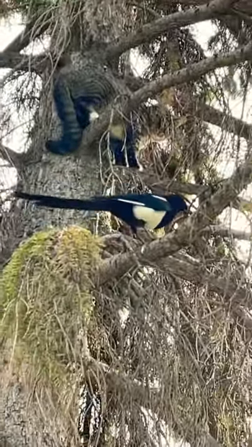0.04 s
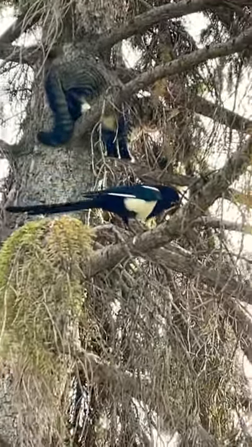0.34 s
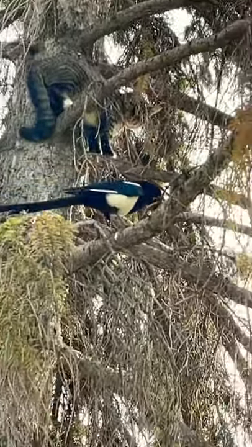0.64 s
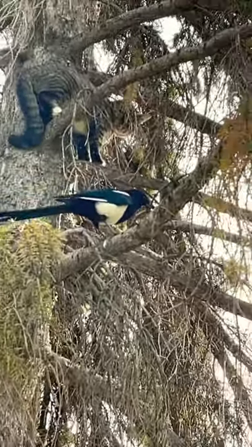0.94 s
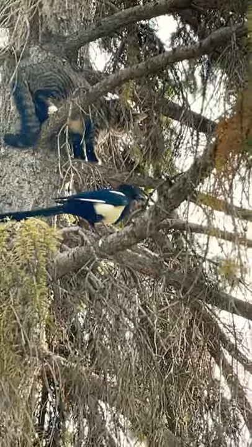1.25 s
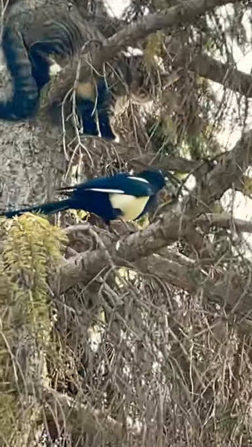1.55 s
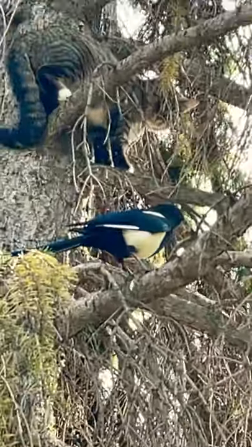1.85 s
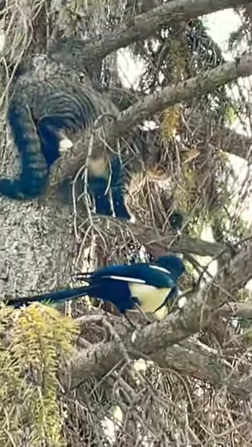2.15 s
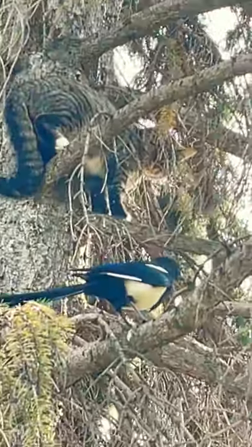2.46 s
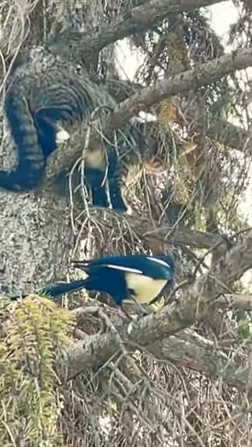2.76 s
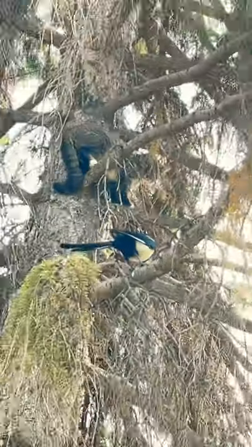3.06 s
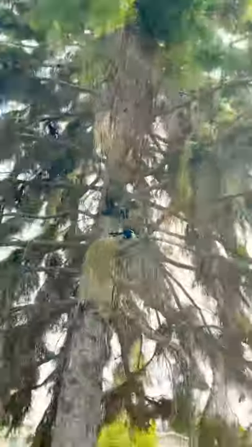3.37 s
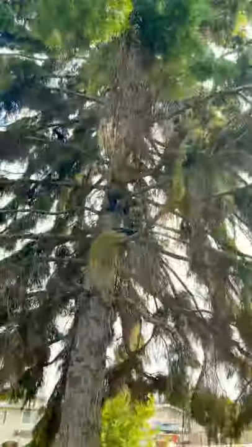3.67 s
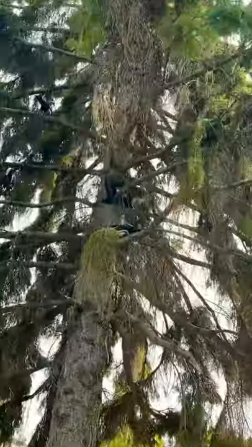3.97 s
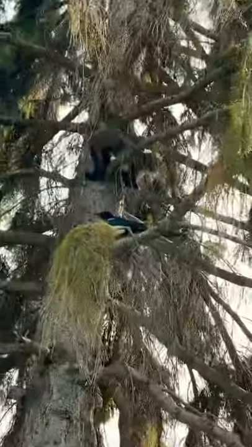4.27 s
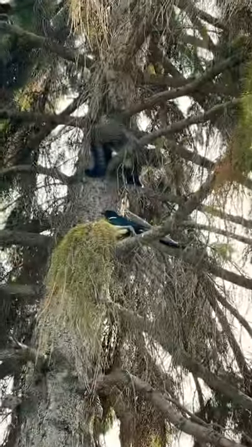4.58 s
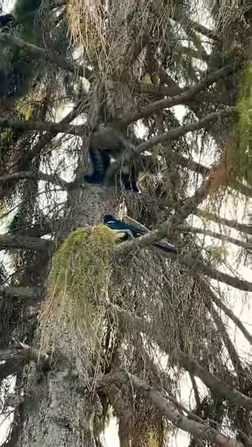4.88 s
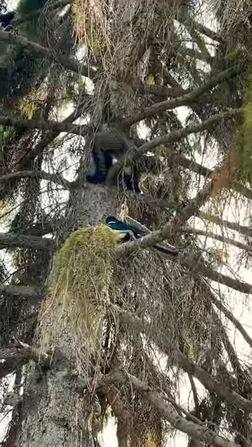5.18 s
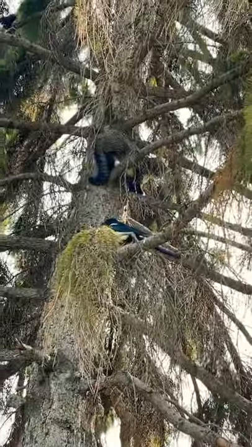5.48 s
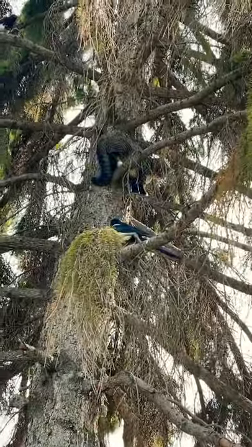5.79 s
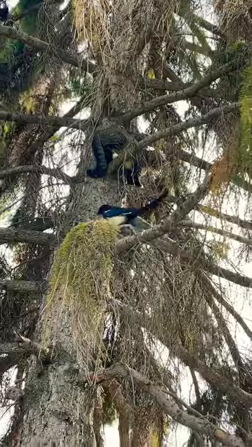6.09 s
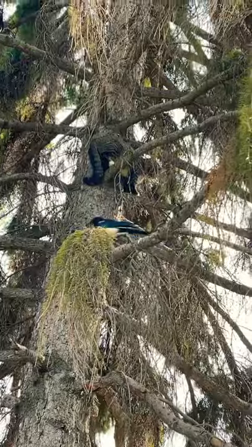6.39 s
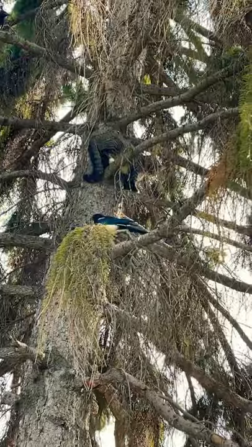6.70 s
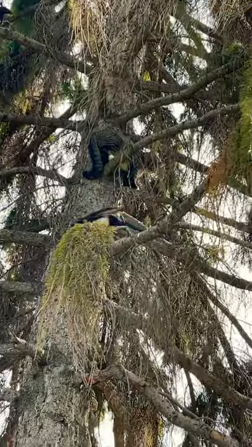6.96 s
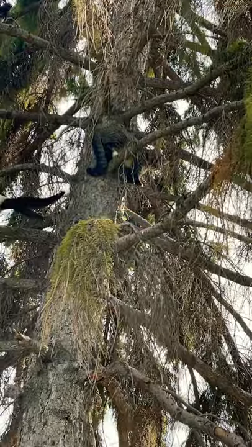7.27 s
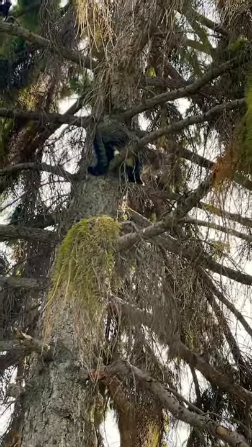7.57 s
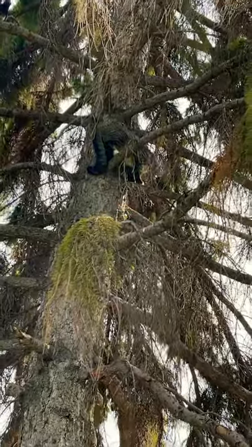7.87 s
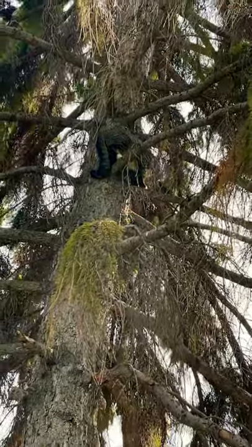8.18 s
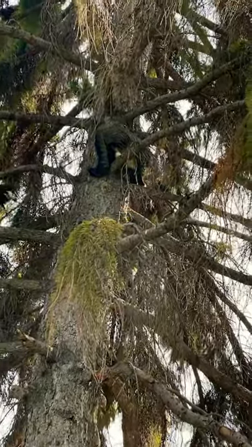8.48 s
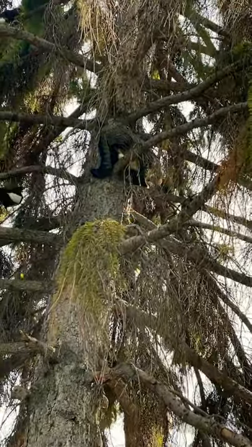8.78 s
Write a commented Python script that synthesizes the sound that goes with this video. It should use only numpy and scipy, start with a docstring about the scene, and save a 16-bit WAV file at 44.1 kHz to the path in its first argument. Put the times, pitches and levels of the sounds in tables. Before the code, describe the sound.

Harsh, rattling magpie calls come in three quick bursts outdoors, each note rising and leaving a slight echo. Low mutters fill the pauses, and soft rising squeals lead into the last burst. The microphone picks up dull handling bumps, thickest at the start, and an uneven wind rumble. Far behind are traffic, lightly hissing leaves and a few faint, very high whistles from a small bird.

```python
"""A magpie scolds a cat in a spruce: bursts of harsh notes, each a rising, rattling rasp that
brightens as the beak opens. Its voice box buzzes, and its throat and beak shape the buzz.
Trunk and branches scatter the calls and the garden answers. Handling and puffs of air bump the
microphone, over distant traffic, hissing leaves, a hoarse far tone and a small bird's thin whistles."""
import sys
import numpy as np
from scipy import signal
from scipy.fft import rfft, irfft, next_fast_len
from scipy.io import wavfile
from scipy.ndimage import uniform_filter1d, map_coordinates

SR = 44100
rng = np.random.default_rng(int(sys.argv[2]) if len(sys.argv) > 2 else 0)


def int16_out(signal):
    """Quantize to a 16-bit WAV file."""
    q = np.round(np.clip(np.atleast_2d(signal).T, -1, 1) * 32767)
    wavfile.write(sys.argv[1], SR, q.astype(np.int16))


N = 398663

# how loud the distant wash sounds; it steps up near 2.2 s as the microphone adjusts:
# t/s, relative level/dB
WASH_LOUDNESS = [(0.0, -60.5), (0.78, -53.5), (1.58, -58.5), (2.21, -55), (2.36, -51), (4.25, -50),
                 (4.43, -51), (5.61, -51), (6.19, -49.5), (7.9, -50.5), (9.04, -58)]


def amp(db):
    """Turn decibels into a gain."""
    return 10 ** (np.asarray(db) / 20)


def unit(x):
    """Scale x to an average (rms) level of 1."""
    return x / np.sqrt(np.mean(x ** 2) + 1e-20)


def steadied(x, window_s):
    """Even out slow changes in the level of x."""
    return x / np.sqrt(np.abs(uniform_filter1d(x ** 2, int(window_s * SR))) + 1e-12)


def along(points, hz):
    """Join (f/Hz, value) points on a log frequency axis."""
    f, values = np.transpose(points)
    return np.interp(np.log(hz + 1), np.log(f + 1), values)


def over_time(points):
    """Join (t/s, value) points across the whole scene."""
    return np.interp(np.arange(N) / SR, *np.transpose(points))


def wobble(rate, size):
    """A smooth curve through `rate` random values a second."""
    return map_coordinates(rng.standard_normal(int(size * rate / SR) + 4), [np.arange(size) * rate / SR])


def filtered(x, response):
    """Scale each frequency in x by response(hz)."""
    m = next_fast_len(len(x) + 4096)
    return irfft(rfft(x, m) * response(np.fft.rfftfreq(m, 1 / SR)), m)[:len(x)]


def rolloff(hz, edge_hz, steepness):
    """A gain of 1 at 0 Hz that falls to a half at the edge."""
    return 1 / (1 + (hz / edge_hz) ** steepness)


def boosted(x, band, db):
    """Turn one band of x up or down by a changing amount."""
    return x + (amp(db) - 1) * filtered(x, band)


def noise(spectrum, size):
    """Noise at level 1, coloured by (f/Hz, level/dB) points."""
    return unit(filtered(rng.standard_normal(size), lambda hz: amp(along(spectrum, hz))))


def tone(pitch, waver=0.0092, rate=253):
    """A pure tone whose pitch wavers by a small share."""
    return np.sin(2 * np.pi * np.cumsum(pitch * (1 + waver * wobble(rate, len(pitch)))) / SR)


def glide(length, pitches, waver):
    """A tone that swells and fades through a start, middle and end pitch."""
    progress = np.linspace(0, 1, int(length * SR))
    pitch = np.polyval(np.polyfit([0, .5, 1], pitches, 2), progress)
    return np.sqrt(2 * np.hanning(len(pitch))) * tone(pitch, waver, rate=250)


def arch(t, rise_db_per_s, fall_db_per_s):
    """A level that climbs to 0 dB at t = 0, then drops."""
    return np.minimum(rise_db_per_s * t, -fall_db_per_s * t)


def add(track, start, x):
    """Mix x into the track at `start` seconds."""
    part = track[max(round(start * SR), 0):][:len(x)]
    part += x[:len(part)]


def air_rumble(gain_db=4.0, flutter_db=1.44):
    """Moving air rumbles unevenly on the microphone."""
    # strength of the rumble: t/s, relative level/dB
    strength = [(0.0, -50), (0.12, -52), (0.6, -43), (1.94, -49.5), (3.72, -45), (5.06, -51.5), (5.36, -47),
                (7.38, -51.5), (7.63, -48.5), (9.04, -57.5)]
    # its deep colour: f/Hz, level/dB
    spectrum = [(25, -55), (38, -32), (51, 2), (68, 6.5), (85, 7.5), (115, -2), (170, -7.5), (300, -13),
                (420, -25.5), (660, -88)]
    return amp(over_time(strength) + gain_db + flutter_db * wobble(14, N)) * noise(spectrum, N)


def traffic(gain_db=3):
    """Distant traffic blends into a dull wash."""
    # colour of the wash: f/Hz, level/dB
    spectrum = [(60, -39), (120, 0.5), (250, 2), (450, -2.5), (600, -1), (950, -2.5), (1300, -7),
                (1700, -16.5), (3000, -26), (8000, -86)]
    return amp(over_time(WASH_LOUDNESS) + gain_db) * noise(spectrum, N)


def leaves(level_db=-57.0, follow=0.32):
    """Leaves hiss lightly, a little louder whenever the distant wash sounds louder."""
    # colour of the hiss: f/Hz, level/dB
    spectrum = [(710, -48), (1200, -2), (1470, -5), (2480, -7), (2710, -5.5), (4290, -10), (6870, -16),
                (12200, -26), (15500, -28)]
    wash_db = over_time(WASH_LOUDNESS)
    return amp(level_db + follow * (wash_db - wash_db.mean())) * noise(spectrum, N)


def bumps(gain_db=-6, grip_until_s=2.25, grip_db=-35):
    """Handling and puffs of air thud on the microphone; harder bumps sound brighter."""
    # bumps: t/s, relative level/dB, rough length/s, hardness (gain above about 220 Hz)/dB
    knocks = [(0.117, -32, 0.024, -5), (0.262, -23, 0.035, 7), (0.342, -22, 0.023, 15),
              (0.491, -17, 0.05, 12), (.574, -11, 0.023, 9), (.612, -21.5, 0.03, 16),
              (0.679, -27, 0.058, 2), (.79, -24.5, 0.036, -5), (.864, -22, 0.024, 7.5),
              (1.039, -23.5, 0.068, -2), (1.138, -24.5, 0.048, 0), (1.252, -37.5, 0.088, 12),
              (1.357, -23, .016, 10), (1.628, -28.5, 0.027, -13), (1.715, -25.5, 0.031, -1),
              (1.968, -27, 0.019, -15), (2.035, -29, 0.017, 6), (2.352, -21, 0.038, -24),
              (2.49, -22.5, 0.027, -17), (3.057, -20.5, .027, -6), (3.159, -25, 0.036, -18),
              (3.426, -25, 0.016, 2), (3.511, -22, 0.021, -27), (3.554, -26.5, 0.02, -28),
              (3.613, -15.5, 0.056, -8), (3.858, -23, 0.033, -4), (4.25, -16.5, 0.036, -13),
              (5.213, -24.5, 0.023, -27), (5.548, -20.5, .027, -22)]
    # colour of a thud: f/Hz, level/dB
    spectrum = [(20, -60), (35, -37), (55, -12), (75, 2), (160, -1.5), (230, -7), (350, -17.5), (480, -20),
                (600, -28), (1100, -58), (2400, -110)]
    # the hand shifts its grip at first, adding small random bumps
    fidgets = [(grip_until_s * when, grip_db + 3 * (2 * size - 1), .02, 2)
               for when, size in rng.random((16, 2))]
    track = np.zeros(N)
    for start, db, length, hard_db in list(knocks) + fidgets:
        age = np.arange(SR // 4) / SR / (length / 2)  # 1 at the peak
        thud = filtered(noise(spectrum, len(age)), lambda hz: amp(hard_db * (1 - rolloff(hz, 220, 4))))
        swell = (age * np.exp(1 - age)) ** 2
        add(track, start, amp(db + gain_db) * steadied(thud, 0.057) * swell)
    return track


def far_tones(pitch_hz=1330):
    """A held tone far away, made hoarse by its quickly wavering pitch."""
    # distant tones: t/s, length/s, level/dB
    tones = [(0.48, 0.29, -59.5), (7.05, .26, -53.5), (7.5, 0.27, -57)]
    track = np.zeros(N)
    for start, length, db in tones:
        add(track, start, amp(db) * branches(glide(length, [pitch_hz] * 3, waver=.055)))
    return track


def branches(x, scatter_db=-6, fade_s=0.11):
    """Trunk and branches throw back quick little echoes, different for every call."""
    t = np.arange(SR // 8) / SR
    echoes = rng.standard_normal(len(t)) ** 3 * amp(-60 * t / fade_s) * (t > .001)
    return signal.fftconvolve(x, (t == 0) + amp(scatter_db) * echoes / np.linalg.norm(echoes))


def garden(x, tail_db=-12.5, build_s=0.0064, wall_s=.115, wall_db=-22):
    """The garden answers with a blur of echoes, plus one dull echo off a house wall."""
    # how long the garden rings: f/Hz, time to fade by 60 dB/s
    ring_times = [(300, 0.17), (1800, 0.75), (2700, 0.52), (6000, 0.5), (14000, 0.16)]
    hz, age, bands = signal.stft(rng.standard_normal(SR), SR, nperseg=256)
    fade = amp(-60 * age / along(ring_times, hz)[:, None]) * (1 - np.exp(-age / build_s))
    tail = signal.istft(bands * fade, SR, nperseg=256)[1]
    echoes = signal.fftconvolve(x, amp(tail_db) * tail / np.linalg.norm(tail))[:N]
    add(echoes, wall_s, amp(wall_db) * filtered(x, lambda hz: rolloff(hz, 4500, 4)))
    return x + echoes


def voice_box(size, start_hz, end_hz, rough, jitter=0.0903, rattle_hz=240, rattle_depth=0.18):
    """One membrane makes a rising buzz that breaks up into hiss; a slower one chops it."""
    progress = np.linspace(0, 1, size)
    chaos = np.clip(rough + .35 * progress ** 3, 0, 1)
    pitch = (start_hz + (end_hz - start_hz) * progress ** 1.4) * (1 + jitter * chaos * wobble(600, size))
    phase = 2 * np.pi * np.cumsum(pitch) / SR
    harmonics = np.arange(1, 23)[:, None]
    # the windpipe smears each pulse and favours other harmonics in every note
    strength = amp(2 * rng.standard_normal(harmonics.shape))
    lag = rng.uniform(0, 2 * np.pi, harmonics.shape)
    buzz = unit((strength * np.cos(harmonics * phase + lag)).sum(0))
    hiss = unit(rng.standard_normal(size) * (1 + .5 * np.cos(phase)))
    voice = np.sqrt(1 - chaos) * buzz + np.sqrt(chaos) * hiss
    chop = np.cos(2 * np.pi * np.cumsum(rattle_hz * (1 + 0.259 * wobble(119.1, size))) / SR)
    return voice * (1 + rattle_depth * np.clip(chaos + progress ** 2, 0, 1) * chop)


def throat(source, low_db, tuning, rough, widen, clear_below=0.38):
    """Throat and beak ring at certain pitches (resonances), giving the voice a body and a treble."""
    # main resonances of throat and beak: f/Hz, base half width/Hz, level/dB
    resonances = [(893, 210, -15), (1868, 500, -4), (2636, 175, 5), (3120, 375, -8.5)]
    # upper resonances in a rasp: f/Hz, level/dB
    rasp_colour = [(2120, -102), (3600, -7.5), (4090, -6), (4570, -2.5), (5390, 2), (5830, -4.5),
                   (6710, -4), (7770, -8), (9450, -11), (10200, -17.5), (10900, -17.5), (11900, -20.5),
                   (13100, -22), (14800, -22), (15500, -23)]
    # upper resonances in a clear note: f/Hz, level/dB
    clear_colour = [(2600, -32), (3300, -48), (3900, -1.5), (4650, 5), (5300, 3), (5900, 9), (6600, -8),
                    (7400, -8), (8600, -8.5), (10200, -25.5), (12000, -19), (14500, -30)]
    # narrow rings of the windpipe: f/Hz, half width/Hz, gain/dB
    rings = [(4230, 140, 1), (5640, 41, -1), (6330, 78, 3), (8400, 250, 0.5), (12000, 390, 5)]
    clear = max(1 - (rough / clear_below) ** 2, 0)
    ripple_db = rng.standard_normal(64)  # tongue and beak shape each note a little differently

    def lower(hz):
        peaks = sum(amp(db) * rolloff(hz - centre, widen * width, 2) ** 2
                    for centre, width, db in resonances)
        return peaks * amp(low_db * rolloff(hz, 2200, 10))

    def upper(hz):
        rasp_db = along(rasp_colour, hz) + np.interp(hz, np.linspace(0, SR / 2, 64), ripple_db)
        rasp_db += sum(db * rolloff(hz - centre, width, 2) for centre, width, db in rings)
        return amp(clear * along(clear_colour, hz / tuning) + (1 - clear) * rasp_db)

    # the main resonances slide up through five blended positions, further in clear notes
    progress = np.linspace(0, 1, len(source))
    slide = 0.014 + 0.083 * clear
    body = np.zeros(len(source))
    for position in np.linspace(0, 1, 5):
        blend = np.maximum(1 - 4 * np.abs(progress - position), 0)
        shift = tuning * (1 + slide * (position - .45))
        body += blend * filtered(source, lambda hz: lower(hz / shift))
    return steadied(body, 0.0155), steadied(filtered(source, upper), 0.038)


def magpie_mutters(treble_db=-11):
    """Quiet, darker notes with the beak nearly shut and the resonances damped."""
    # mutters: t/s, length/s, level/dB, start f/Hz, end f/Hz, roughness/0-1
    notes = [(0.751, 0.15, -49, 606, 735, 0.6), (1.146, 0.15, -52, 521, 792, .4),
             (1.949, 0.073, -58, 602, 734, .5), (4.809, 0.18, -44, 521.6, 722, 0.68),
             (5.624, 0.2, -43.5, 513, 728, 0.8), (7.025, .12, -46.5, 563, 700, 0.65),
             (7.886, 0.19, -45.5, 444, 657, 0.49), (7.989, 0.061, -43.5, 737, 800, .3)]
    track = np.zeros(N)
    for start, length, db, start_hz, end_hz, rough in notes:
        size = int(length * SR)
        buzz = voice_box(size, start_hz, end_hz, rough)
        body, treble = throat(buzz, low_db=7, tuning=0.98, rough=rough, widen=2.5)
        add(track, start, branches(amp(db) * np.hanning(size) ** 0.72 * (body + amp(treble_db) * treble)))
    return track


def magpie_scolds(main_hz=2644, full_voice_db=-27.5, beak_lag_s=0.019, attack_s=0.022, release_s=0.019):
    """Each loud note swells as the beak opens, peaks in a bark if rough or a yelp if clear, then sags."""
    # scolding notes: t/s, time to peak/s, length/s, level/dB, beak opening as treble/dB,
    # low resonances/dB, start f/Hz, end f/Hz, roughness/0-1, throat tuning/ratio
    notes = [(0.854, .044, 0.12, -30.5, -0.5, -10, 654, 851, 0.12, 1.025),
             (2.235, 0.052, 0.11, -29, -3, -0.5, 574.4, 957.4, 0.25, 1.036),
             (2.379, 0.11, 0.18, -35.5, -5.5, -5, 520, 722, .4, 0.99),
             (2.58, 0.1, 0.15, -34, -6.5, -5, 572, 797.5, 0.37, 1.035),
             (2.788, 0.086, 0.14, -34, -7, -2, 565, 767, 0.44, 1.023),
             (2.963, 0.11, 0.2, -34, -6, 0.5, 540.5, 759.5, 0.58, 1.024),
             (3.227, 0.1, 0.14, -28, -3.5, 2, 551, 800.5, 0.55, 1.013),
             (3.401, 0.11, .14, -28, -2.5, -1, 551, 799, 0.6, .99),
             (3.555, 0.11, 0.17, -26.5, -5.5, -1.5, 550, 800.5, 0.63, 1.02),
             (3.791, 0.11, 0.15, -28, -1.5, 5.5, 547, 795.6, 0.63, 1.02),
             (3.972, 0.11, 0.18, -27, -2.5, -1.5, 548.6, 799, 0.69, 0.99),
             (4.143, 0.12, .15, -27.5, -1.5, -1.5, 550, 793, 0.57, 1.0),
             (4.337, 0.11, 0.15, -28, -1.5, -0.5, 550, 806, 0.6, 0.99),
             (5.783, 0.059, 0.11, -28, -1.5, 0.5, 625, 943, 0.23, 1.07),
             (5.955, 0.066, 0.11, -26.5, -4.5, -1.5, 545, 964, 0.32, 1.04),
             (6.116, 0.074, 0.11, -24.5, -6, -1.5, 535, 984, 0.34, 1.026),
             (6.28, 0.095, .13, -26, -0.5, -2.5, 548, 828, 0.65, 0.976),
             (6.439, .096, 0.14, -27, -1.5, -3, 547, 820, 0.73, 0.97),
             (6.611, .095, 0.13, -27.5, 0, -2, 548.3, 823, 0.67, 0.97),
             (6.812, 0.093, .14, -29, -2.5, -1.5, 552.4, 797, 0.74, 0.97),
             (8.252, 0.11, .188, -37, -3, -9, 470, 697, 0.49, .99),
             (8.516, 0.1, 0.13, -32, -1.5, -2.5, 500, 740, 0.51, 0.98),
             (8.686, 0.1, 0.14, -31.5, -1, -8, 529.5, 760, 0.63, 0.94),
             (8.858, 0.11, 0.17, -32, -0.5, -5.5, 533, 767, 0.66, 0.955)]
    track = np.zeros(N)
    for start, peak_s, length, db, open_db, low_db, start_hz, end_hz, rough, tuning in notes:
        t = np.arange(int(length * SR)) / SR
        from_peak = t - peak_s
        clear = max(1 - rough / 0.67, 0)
        buzz = voice_box(len(t), start_hz, end_hz, rough)
        body, treble = throat(buzz, low_db, tuning, rough, widen=1.2)
        # effort and beak opening rise and fall, more gently in softer notes
        steepness = np.exp(.06 * (db - full_voice_db))
        effort_db = db + steepness * arch(from_peak, 56.5, 130) + 0.96 * wobble(113.3, len(t))
        beak_db = steepness * arch(from_peak - beak_lag_s, 86, 72)
        beak_db -= 2 * np.exp(-t / 0.011)  # the beak is still parting at the start
        # bark: the main resonance jumps out for an instant
        bark_db = 7.5 * (1 - clear) * np.exp(-(from_peak / 0.005) ** 2)
        body = boosted(body, lambda hz: rolloff(hz - main_hz * tuning, 450, 4), bark_db)
        # yelp: one overtone sweeps through that resonance while the rest gives way
        pitch = start_hz + (end_hz - start_hz) * (t / length) ** 1.393
        overtone = tone(pitch * main_hz * tuning / np.interp(peak_s, t, pitch))
        yelp = np.sqrt(clear) * np.exp(-(from_peak / 0.02) ** 2)
        body = body * amp(-5.5 * yelp) + amp(6.5) * yelp * overtone
        # the lowest tone sings out late in a clear note
        body += clear * amp(low_db - 13.5) * 2 * t / length * tone(pitch)
        # the highest fizz grows as the beak opens and is weaker in clear notes
        fizz_db = -1.6 - 3.5 * clear ** 2 + .1 * beak_db
        treble = boosted(treble, lambda hz: 1 - rolloff(hz, 8000, 6), fizz_db)
        voice = amp(-0.94) * body + amp(open_db + beak_db - 1.3) * treble
        fade = np.clip(np.minimum(t / attack_s, (length - t) / release_s), 0, 1)
        add(track, start, branches(fade * amp(effort_db) * voice))
    return track


def gliding_calls(calls, waver):
    """A row of gliding tones, each scattered by the branches."""
    track = np.zeros(N)
    for start, length, db, *pitches in calls:
        add(track, start, amp(db) * branches(glide(length, pitches, waver)))
    return track


def small_bird():
    """A small bird whistles thin, very high, almost pure tones."""
    # whistles: t/s, length/s, level/dB, start f/Hz, middle f/Hz, end f/Hz
    whistles = [(4.687, 0.086, -69, 11200, 11100, 11550), (4.8, .13, -68, 11400, 10800, 10900),
                (7.37, .12, -77, 11000, 11400, 12000), (7.477, .06, -69, 12000, 12600, 12100),
                (7.52, .094, -70, 11250, 11520, 11900), (7.64, .14, -75, 11700, 10900, 10560),
                (7.74, .1, -74, 12450, 12470, 12600)]
    return gliding_calls(whistles, waver=.006)


def magpie_squeals():
    """The magpie squeals softly on a rising, wavering pitch."""
    # squeals: t/s, length/s, level/dB, start f/Hz, middle f/Hz, end f/Hz
    squeals = [(7.925, .13, -47.5, 1350, 2050, 3280), (8.009, 0.041, -43, 2800, 2955, 3030),
               (8.262, .32, -52, 880, 1267, 1470)]
    return gliding_calls(squeals, waver=0.026)


def scene():
    """Calls echoing in the garden, bumps at the microphone and the steady surroundings."""
    calls = magpie_scolds() + magpie_mutters() + small_bird() + magpie_squeals() + far_tones()
    return (garden(calls) + bumps() + air_rumble() + traffic() + leaves())[None]


def record(dry, low_cut_hz=38, top_hz=15750):
    """The phone drops the deepest bass and the very highest treble."""
    return filtered(dry[0], lambda hz: (hz < top_hz) * (1 - rolloff(hz, low_cut_hz, 6)))[None]


dry = scene()
out = record(dry)
int16_out(out)
```